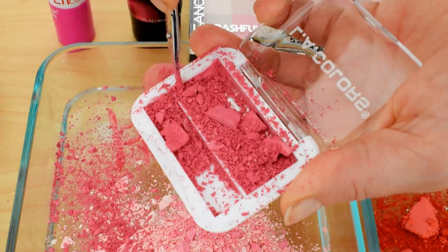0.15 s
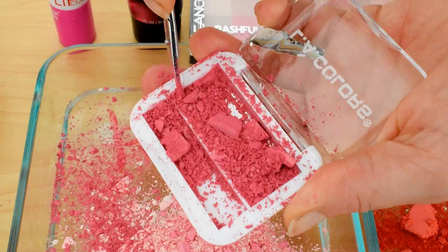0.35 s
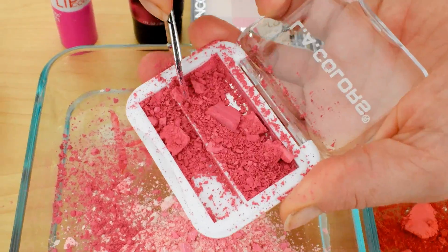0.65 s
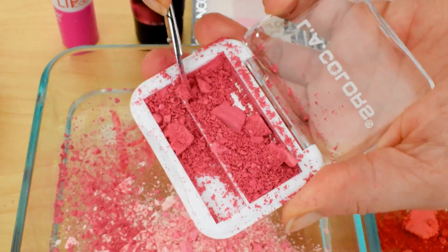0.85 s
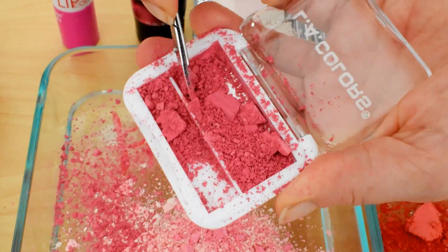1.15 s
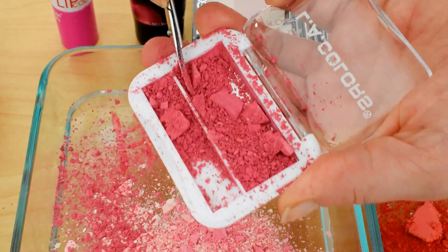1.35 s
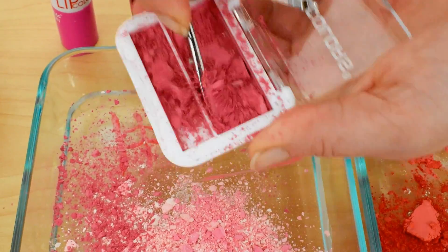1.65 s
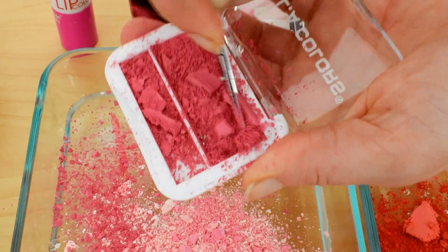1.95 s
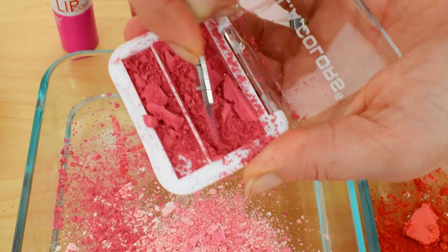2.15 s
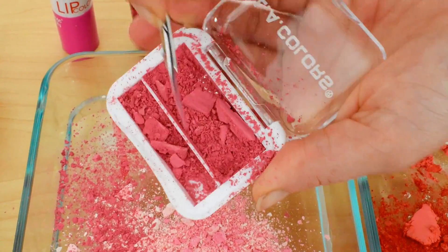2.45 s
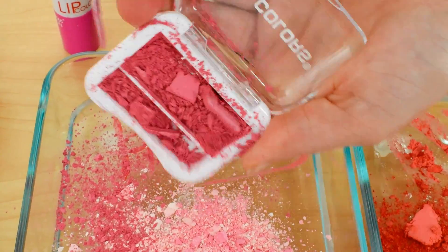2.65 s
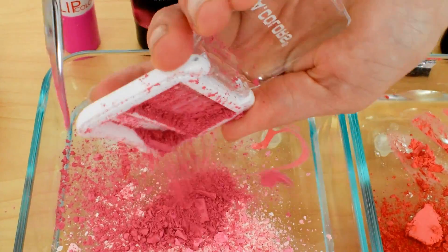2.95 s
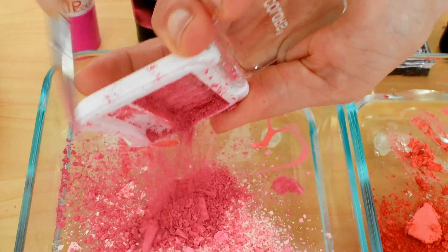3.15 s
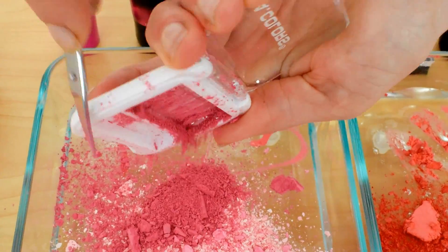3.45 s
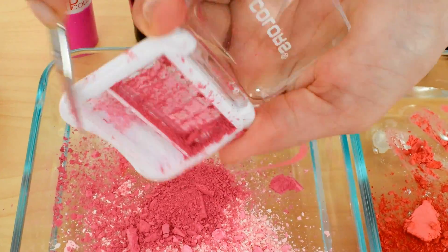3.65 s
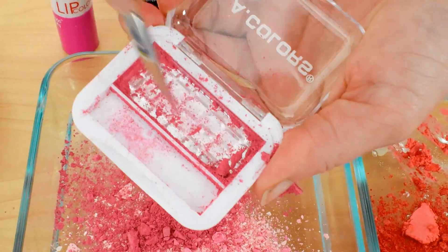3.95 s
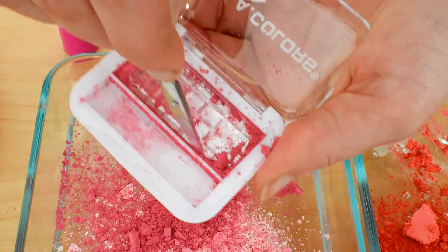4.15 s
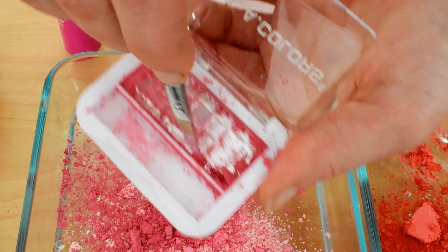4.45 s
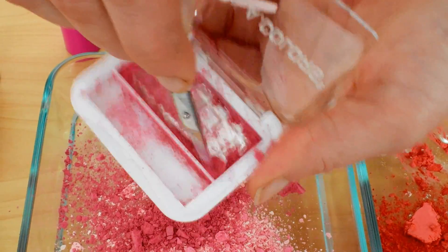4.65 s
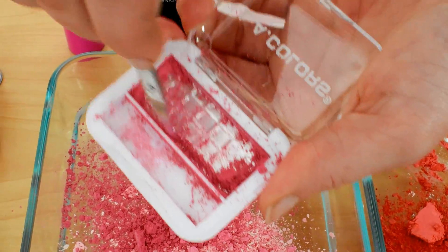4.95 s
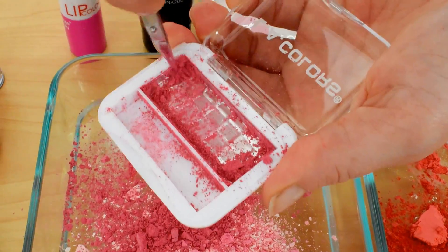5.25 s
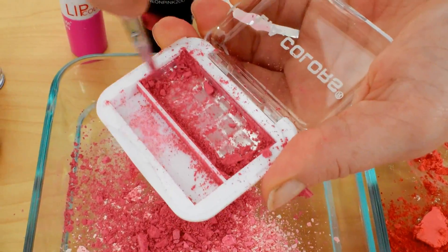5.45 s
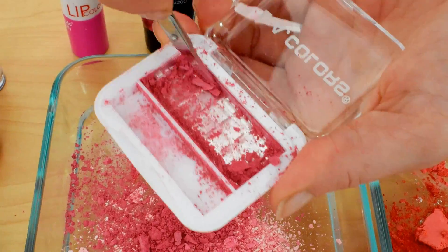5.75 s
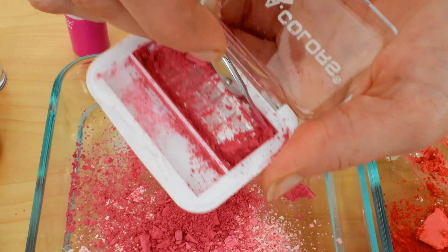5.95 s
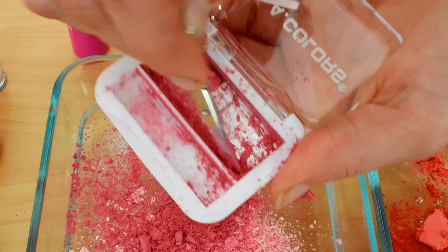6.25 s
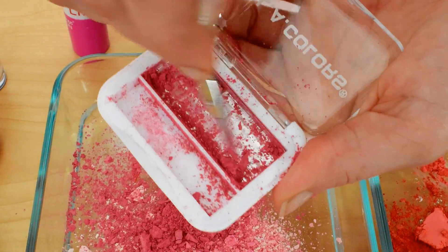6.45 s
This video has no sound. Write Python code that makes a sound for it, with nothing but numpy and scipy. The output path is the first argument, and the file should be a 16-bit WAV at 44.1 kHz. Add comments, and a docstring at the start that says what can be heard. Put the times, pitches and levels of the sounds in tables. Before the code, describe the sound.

Close-up dry scratching and gritty crunching of powder in a hollow plastic pan, four knocks midway, then busier, louder digging over low room hum.

```python
"""A steel blade digs pressed powder out of a small plastic compact held over a glass tray.
Strokes, cracking lumps, catches and rib runs are forces of random grains or single contacts.
They excite resonances of pan and blade and the hollow case; halfway, four raps knock crumbs out.
Two spaced microphones stand close by in a small dry room with a low electric hum."""
import sys
import numpy as np
from scipy import signal
from scipy.fft import rfft, irfft, next_fast_len
from scipy.io import wavfile

SR = 44100
rng = np.random.default_rng(int(sys.argv[2]) if len(sys.argv) > 2 else 0)


def transcribe(signal):
    """Save signal, clipped to [-1, 1], as a 16-bit WAV file at the path in sys.argv[1]."""
    frames = np.atleast_2d(signal).T
    limited = np.clip(frames, -1, 1)
    pcm = np.round(limited * 32767).astype(np.int16)
    wavfile.write(sys.argv[1], SR, pcm)


N = 291060
TIME_S = np.arange(N) / SR

# strokes through the powder: start_s, length_s, hardest_push (share of length), level_db,
#   hollow_hz, hollow_above_ring_db, tilt_db_per_octave, left_minus_right_db
STROKES = [(0.0, 0.019, 0.067, -49, 820, -17.5, 0.5, -6.5), (0.4, 0.026, .3, -52, 795, -4.5, -1, -2),
           (0.939, 0.047, 0.68, -55.5, 800, -12, -2.5, 0), (1.193, 0.092, 0.64, -62.5, 800, -4.5, 1.5, -1),
           (1.414, 0.058, 0.64, -48.5, 764, -5, -0.5, 1.5), (1.492, 0.086, 0.26, -59.5, 766, -10, 0, -2.5),
           (1.576, 0.095, 0.51, -45.5, 856, -5, -2, -2.5), (1.921, 0.042, 0.43, -54, 1110, -0.5, 1, -3),
           (2.019, 0.067, 0.86, -49.5, 1110, 0.5, -1, -3.5),
           (2.167, 0.034, 0.69, -51.5, 1090, -3.5, -1, -3.5), (2.3, 0.048, 0.39, -57, 1200, -4, -3, -2.5),
           (4.147, 0.073, 0.66, -54, 1070, -8.5, 3, 1.5), (4.407, 0.098, 0.93, -56.5, 900, -6.5, 3.5, 2),
           (4.561, .033, 0.59, -55, 950, -10, 4, 1.5), (4.62, 0.072, 0.69, -54.5, 1000, 0.5, -2, 1),
           (4.839, 0.079, 0.33, -59, 920, -4, 3, 0.5), (4.908, 0.17, 0.31, -50, 965, -4.5, 2.5, 1.5),
           (5.186, 0.077, 0.29, -45.5, 1300, -7, 3, -2), (5.319, 0.054, 0.63, -43.5, 1200, -7.5, 1, 0.5),
           (5.454, 0.073, 0.44, -46, 1400, -1, 3.5, -0.5), (5.688, 0.044, 0.53, -51, 740, -8.5, 0.5, -2),
           (5.741, 0.21, 0.44, -51, 640, -4, -1, -0.5), (6.139, 0.071, 0.55, -47.5, 1040, 2.5, -6, -0.5),
           (6.242, 0.0272, 0.35, -58.5, 1040, -0.5, 4, -2), (6.293, 0.074, .55, -51.5, 1040, -3, 0.5, -1),
           (6.41, 0.046, 0.92, -48, 1050, -7.5, -4, -1.5)]
# lumps crack off the cake: start_s, level_db, hollow_above_ring_db, tilt_db_per_octave
LUMPS = [(0.397, -46, -9, 0.5), (1.916, -40, -7.5, 0), (2.0428, -38.5, -10.5, -10.5), (5.202, -34, -24, 14),
         (5.222, -33, -13.5, 9), (6.1332, -31, -5.5, 0.5), (6.143, -29.5, -10, -4), (6.2892, -40, -6, -3.5)]
# blade catches on a hard crumb or the rim and snaps free:
#   start_s, level_db, hollow_above_ring_db, tilt_db_per_octave
CATCHES = [(.4448, -60, -16, 1), (.92, -58.5, -8, -2), (.957, -48.5, -13, -1), (1.4279, -48.5, 3, -11),
           (1.4477, -40, -17, -1), (1.4954, -46.5, -7.5, -1), (1.609, -42.5, -16, 3),
           (1.633, -38.5, -13, 4), (2.014, -47.5, -11, -9.5), (2.118, -46, -12, 2), (2.1816, -34, -7, -5),
           (2.303, -46, -12, -10), (4.1611, -44.5, -7, -5), (4.2102, -55.5, 8.5, -19),
           (4.45, -32, -17.5, -1), (4.6264, -39, -20, 0.5), (4.6416, -43.5, -13, 1), (4.662, -35, -7.5, -2),
           (4.77, -59.5, 6, 10), (4.86, -45.5, -8.5, -9), (4.9055, -40.5, -13, -2), (5.4382, -56.5, 0, 6),
           (5.4987, -41, -3, 3), (5.6281, -52.5, -15, 11.5), (5.6356, -54, 1, -6),
           (6.1745, -28.5, -6, -1.5), (6.3245, -35, -4, -2), (6.349, -40.5, -16, 7),
           (6.5521, -55.5, -22, 4.5)]
# tip dragged across the ribs of the pan: first_rib_s, last_rib_s, ribs_per_s,
#   level_db (before fade and chance), hollow_above_ring_db, tilt_db_per_octave
RIB_RUNS = [(4.9298, 5.0396, 37, -33.5, -13.5, 0), (5.737, 5.8782, 58, -39, -6.5, 1.5)]
# resonances of pan and blade: pitch_hz, width_hz, relative_db (before chance)
PAN_MODES = [(1640, 100, -4), (2010, 127, 6.5), (2664, 340, 1.5), (3820, 93, 2), (4645, 150, 8),
             (5110, 170, 12), (5430, 480, 2.5), (5460, 300, -2.5), (6230, 810, 3.5), (7000, 217, -24),
             (8600, 1000, -4), (9760, 1600, -4.5), (12530, 10200, -34)]
# blade's bending note, lower once the fingers shift their grip: from_s, to_s, pitch_hz, width_hz, gain_db
GRIPS = [(0, 3.15, 3730, 597, -5), (3.15, 7, 2540, 298, -11.5)]
# narrow modes of the steel: pitch_hz, width_hz, gain_db
SINGING_MODES = [(1094, 13, 3), (1148, 11, 4), (2014, 14, -2), (2677, 30, -1), (4880, 22, -1), (5943, 20, -1)]
# raps on the case: start_s, level_db, hollow_hz, hollow_above_ring_db, tilt_db_per_octave,
#   left_minus_right_db, blade_ring_hz, blade_ring_db
RAPS = [(3.0427, -28.5, 950, -2, -1.6, -2, 3600, -31.5), (3.2364, -31, 830, -2, -2, -3.5, 2570, -32.5),
        (3.4181, -30.5, 870, -2.5, 1, -3, 2570, -31), (3.5862, -30, 910, -2.5, -1, -4, 2670, -28)]
# room's answer: pitch_hz, relative_db, t60_s
ROOM = [(200, -16.5, 0.36), (530, -3.5, 0.2), (860, -13.5, 0.23), (2480, -9.5, 0.17), (4870, -10.5, 0.14),
        (9150, -13, 0.15), (15500, -12.5, 0.058)]
# spectrum of room air: pitch_hz, relative_db (per Hz)
AIR = [(15, 0.5), (31, -0.5), (46, 2), (75, -4), (150, -9), (270, -15.5), (500, -21.5), (1300, -25),
       (2500, -33), (6000, -35.5), (16000, -37.5)]
# hum: pitch_hz, level_db (before waver and panning)
HUM = [(90.5, -67.5), (120, -67), (240, -72.5), (300.5, -77.5), (355, -78)]


def strokes():
    """The blade judders through the cake, breaking grains as it goes."""
    out = np.zeros((2, N))
    for start_s, length_s, hardest, level_db, *spot in STROKES:
        force = grind(length_s, hardest)
        scrape = compact(force, *spot, hollow_spread=1.48, crackle_db=8.5)
        add(out, start_s, np.sqrt(length_s * SR) * from_db(level_db) * scrape)
    return out


def grind(length_s, hardest, grains_per_s=8000, grain_db=4, judder_db=4.0, judder_per_s=300, swell=0.74):
    """Force of a juddering blade breaking grains; the push swells to its hardest point and eases off."""
    t = TIME_S[:int((length_s + .025) * SR)]
    peak = np.clip(hardest, .05, .95)
    phase = np.interp(t / length_s, [0, peak, 1], [0, 1, 0])
    pressure = np.sin(np.pi / 2 * phase) ** swell
    judder = from_db(judder_db * drift(judder_per_s, t))
    return crumble(t, grains_per_s, grain_db) * pressure * judder


def crumble(t, grains_per_s, size_db):
    """Grains of powder break at random, most small, a few large."""
    sizes = from_db(size_db * np.minimum(rng.exponential(1, len(t)), 4))
    signs = rng.choice([-1, 1], len(t))
    return sizes * signs * (rng.random(len(t)) < grains_per_s / SR)


def cracks(crack_s=0.0088):
    """A lump gives way in one short dense crunch."""
    out = np.zeros((2, N))
    for start_s, level_db, hollow_db, tilt_db in LUMPS:
        hollow_hz, pan_db = place(start_s)
        force = grind(crack_s, hardest=0.36)
        crunch = compact(force, hollow_hz, hollow_db, tilt_db, pan_db, hollow_spread=1.67, crackle_db=-0.5)
        add(out, start_s, np.sqrt(crack_s * SR) * from_db(level_db) * crunch)
    return out


def catches():
    """The blade snaps over hard crumbs and the rim."""
    out = np.zeros((2, N))
    for start_s, level_db, *colour in CATCHES:
        add(out, start_s, from_db(level_db) * snap(start_s, *colour))
    return out


def ribs(fade_db=6.5, chance_db=2.3):
    """Evenly spaced ribs give a run of snaps that weaken as the push eases, with chance from rib to rib."""
    out = np.zeros((2, N))
    for first_s, last_s, ribs_per_s, level_db, *colour in RIB_RUNS:
        count = round((last_s - first_s) * ribs_per_s) + 1
        for rib_s in np.linspace(first_s, last_s, count):
            progress = (rib_s - first_s) / (last_s - first_s)
            push_db = chance_db * rng.standard_normal() - fade_db * progress ** 2
            add(out, rib_s, from_db(level_db + push_db) * snap(rib_s, *colour))
    return out


def snap(start_s, hollow_db, tilt_db):
    """The blade slips free with one sharp contact."""
    hollow_hz, pan_db = place(start_s)
    force, size = blow(chatter_s=0.00095, chatter_db=-2)
    return size * compact(force, hollow_hz, hollow_db, tilt_db, pan_db)


def blow(chatter_s, chatter_db):
    """One sharp contact in a bright chatter that swells and dies, and the size for 5 ms at level one."""
    t = TIME_S[:1536]
    envelope = t * np.exp(-t / chatter_s)
    chatter = band(crumble(t, 16000, 6.4) * envelope, 2240, 12500)
    force = from_db(chatter_db) * unit(chatter) + signal.unit_impulse(len(t), 10)
    return force, np.sqrt(.005 * SR)


def place(at_s):
    """Hollow pitch and left-right position of the stroke nearest in time."""
    gaps_s = [abs(at_s - start_s - length_s / 2) - length_s / 2 for start_s, length_s, *_ in STROKES]
    *_, hollow_hz, _, _, pan_db = STROKES[np.argmin(gaps_s)]
    return hollow_hz, pan_db


def compact(force, hollow_hz, hollow_db, tilt_db, pan_db, hollow_spread=1.494, crackle_db=-4,
            mode_chance_db=7.0, thud_db=-13):
    """Force on the pan gives a bright ring and the hollow knock of the case, at both microphones."""
    ring = 0
    for k, (hz, width_hz, db) in enumerate(PAN_MODES):
        # each point of contact favours other modes
        gain = from_db(db + mode_chance_db * rng.standard_normal())
        ring = ring + (-1) ** k * gain * resonate(force, hz, width_hz)
    # the breaking powder is also heard directly
    crackle = from_db(crackle_db) * unit(band(force, 1250, 11800))
    ring = brighten(unit(ring) + crackle, tilt_db)
    # below 1 kHz, the lower the hollow, the more sharply it is tuned
    spread = hollow_spread ** min(hollow_hz / 1000, 1) ** 2
    thud = from_db(thud_db) * unit(band(force, 192, 486))
    hollow = unit(band(force, hollow_hz / spread, hollow_hz * spread)) + thud
    ring = near_field(ring, lag_s=.0007, left_scatter_db=-3, right_scatter_db=4.5, scatter_s=0.00091)
    hollow = near_field(hollow, lag_s=.00008, left_scatter_db=-16, right_scatter_db=-12, scatter_s=.0012)
    return (ring * sides(1.0) + from_db(hollow_db) * hollow * sides(-3.3)) * sides(pan_db)


def brighten(x, tilt_db, pivot_hz=5200):
    """Tip the spectrum about a pivot, in dB per octave: harder grit excites more treble."""
    size = next_fast_len(len(x) + 512)
    hz = np.clip(np.fft.rfftfreq(size, 1 / SR), 1800, 12000)
    octaves = np.log2(hz / pivot_hz)
    return irfft(rfft(x, size) * from_db(tilt_db * octaves), size)[:len(x)]


def near_field(sound, lag_s, left_scatter_db, right_scatter_db, scatter_s):
    """Straight path plus scatter off hands, lid and tray to each microphone; redrawn for every sound."""
    t = TIME_S[:512]
    scatter = unit(rng.standard_normal((2, len(t))) * np.exp(-t / scatter_s))
    paths = from_db([[left_scatter_db], [right_scatter_db]]) * scatter
    paths[:, 0] += 1
    # the right microphone hears it later
    paths[1] = np.interp(t - lag_s, t, paths[1], left=0)
    return unit(signal.fftconvolve(sound[None], paths, axes=1))


def bending(x):
    """Scraping stirs the blade's bending note, broad because the fingers damp it."""
    note = 0
    for from_s, to_s, hz, width_hz, db in GRIPS:
        held = (TIME_S >= from_s) * (TIME_S < to_s)
        note = note + from_db(db) * resonate(x * held, hz, width_hz)
    return note


def singing(x):
    """While it digs, the steel sings on faintly in a few narrow modes."""
    return sum(from_db(db) * resonate(x, hz, width_hz) for hz, width_hz, db in SINGING_MODES)


def raps(ring_t60_s=0.029, after_ring_db=-19, after_t60_s=0.036):
    """Steel knocks on the rim; the blade rings briefly in two decays, damped by the fingers."""
    out, t = np.zeros((2, N)), TIME_S[:SR // 4]
    dying = from_db(-60 * t / ring_t60_s) + from_db(after_ring_db - 60 * t / after_t60_s)
    for start_s, level_db, *spot, ring_hz, ring_db in RAPS:
        force, size = blow(chatter_s=0.0012, chatter_db=2)
        knock = compact(force, *spot, hollow_spread=1.3, crackle_db=9)
        add(out, start_s, size * from_db(level_db) * knock)
        add(out, start_s, from_db(ring_db) * dying * np.sin(2 * np.pi * ring_hz * t))
    return out


def pour(start_s=2.62, end_s=3.11, hiss_db=-73, squeak_s=3.5, squeak_hz=4500, squeak_db=-66):
    """Loose powder slides off with a faint hiss; the tilting case gives a tiny squeak."""
    flow = np.sin(np.pi * np.clip((TIME_S - start_s) / (end_s - start_s), 0, 1))
    hiss = from_db(hiss_db) * flow * unit(band(crumble(TIME_S, 3000, 4.8), 750, 9200))
    swell = np.exp(-((TIME_S - squeak_s) / 0.011) ** 2)
    tone = unit(resonate(rng.standard_normal(N), squeak_hz, 350))
    return np.sqrt(N) * (hiss + from_db(squeak_db) * swell * tone)


def room(x, full_s=0.0016, build_s=0.0098):
    """Short diffuse tail of noise bands, near full at once, that broadly dies sooner in the treble."""
    t = TIME_S[:SR // 3]
    edges_hz = np.geomspace(100, 19000, 12)
    arrival = np.clip((t - full_s) / build_s + 1, 0, 1)
    tails = 0
    for low_hz, high_hz in zip(edges_hz, edges_hz[1:]):
        hz = np.sqrt(low_hz * high_hz)
        decay = from_db(-60 * t / at_hz(ROOM, hz, column=2))
        dying = unit(rng.standard_normal((2, 2, len(t))) * arrival * decay)
        tails = tails + from_db(at_hz(ROOM, hz)) * band(dying, low_hz, high_hz)
    # each channel's sound comes back to both microphones
    return signal.fftconvolve(x[None], tails, axes=2).sum(axis=1)[:, :N] / np.sqrt(2)


def background(air_db=-56, alike=0.24, pan_db=-6.0, waver_db=3.0, waver_rad=0.62, waver_per_s=3.6):
    """Rumble and hiss of the room, partly shared by the sides, with a wavering hum; stronger on the right."""
    white = rfft(rng.standard_normal((3, N)))
    colour = from_db(at_hz(AIR, np.fft.rfftfreq(N, 1 / SR)))
    shared, *own = np.sqrt(N) * unit(irfft(white * colour, N))
    air = from_db(air_db) * (np.sqrt(alike) * shared + np.sqrt(1 - alike) * np.array(own))
    hum = 0
    for hz, level_db in HUM:
        level = from_db(level_db + waver_db * drift(waver_per_s, TIME_S))
        phase = 2 * np.pi * hz * TIME_S + waver_rad * drift(waver_per_s, TIME_S)
        hum = hum + np.sqrt(2) * level * np.sin(phase)
    return (air + hum) * sides(pan_db)


def from_db(db):
    """Gain for a level in dB."""
    return 10 ** (np.asarray(db) / 20)


def unit(x):
    """Scale to an energy of one."""
    return x / np.sqrt(np.sum(x ** 2, axis=-1, keepdims=True) + 1e-20)


def band(x, low_hz, high_hz, order=2):
    """Butterworth band-pass."""
    edges_hz = [low_hz, min(high_hz, .45 * SR)]
    return signal.sosfilt(signal.butter(order, edges_hz, "band", fs=SR, output="sos"), x)


def resonate(x, hz, width_hz):
    """One resonance with a gain of one on top."""
    r = np.exp(-np.pi * width_hz / SR)
    zeros = np.array([1, 0, -1]) * (1 - r * r) / 2
    poles = [1, -2 * r * np.cos(2 * np.pi * hz / SR), r * r]
    return signal.lfilter(zeros, poles, x + 1e-18)


def at_hz(points, hz, column=1):
    """Read a column of a table on a log-frequency axis."""
    table = np.array(points)
    return np.interp(np.log(hz + 1e-9), np.log(table[:, 0]), table[:, column])


def drift(per_s, t):
    """Chance drift between random knots, spread near one."""
    knots = rng.standard_normal(256)
    return np.interp(t * per_s, np.arange(len(knots)), knots, period=len(knots))


def add(track, start_s, sound):
    """Lay a sound into a track."""
    start = max(round(start_s * SR), 0)
    track[..., start:start + sound.shape[-1]] += sound[..., :max(N - start, 0)]


def sides(pan_db):
    """Left and right gains for a left-minus-right difference in dB."""
    return from_db(np.array([[pan_db], [-pan_db]]) / 2)


def scene(room_pan_db=-3, room_db=2.5, bleed=0.057):
    """The compact close by, its room tail, a little bleed between the sides, and the background."""
    digging = strokes() + cracks() + catches() + ribs()
    direct = digging + bending(digging) + raps()
    tail = from_db(room_db) * room(direct) * sides(room_pan_db)
    work = direct + tail + singing(digging) + pour()
    return work + bleed * work[::-1] + background()


def record(dry, cutoff_hz=16000):
    """Steep elliptic low-pass on the top."""
    return signal.sosfilt(signal.ellip(10, .2, 80, cutoff_hz, fs=SR, output="sos"), dry)


dry = scene()
out = record(dry)
transcribe(out)
```